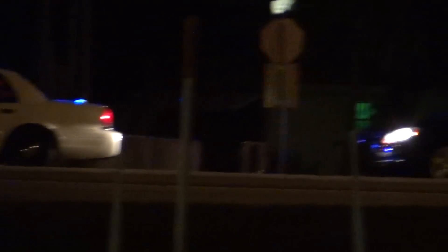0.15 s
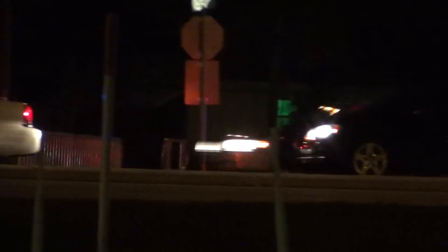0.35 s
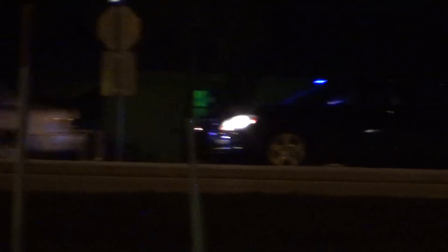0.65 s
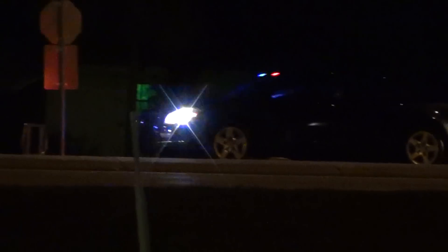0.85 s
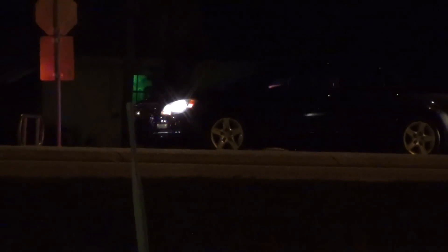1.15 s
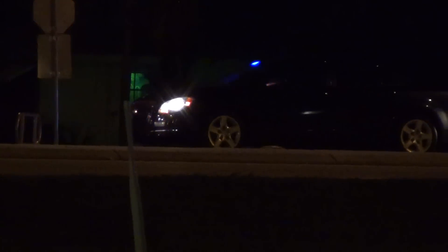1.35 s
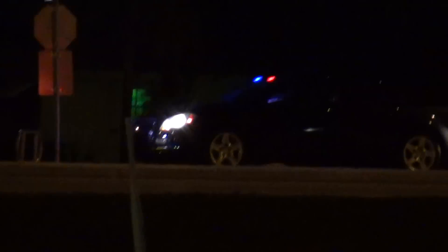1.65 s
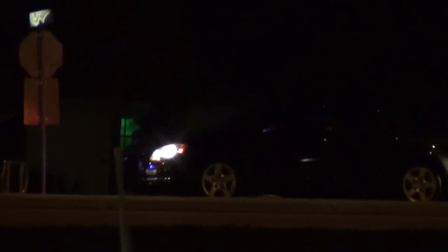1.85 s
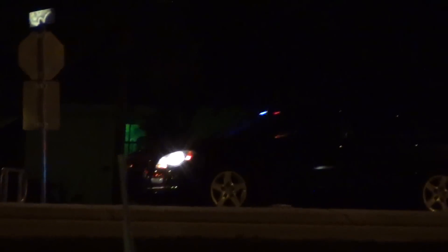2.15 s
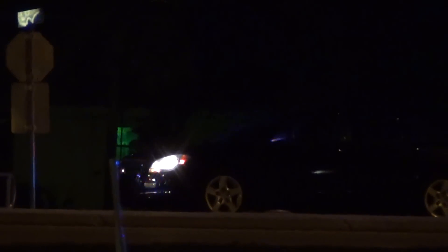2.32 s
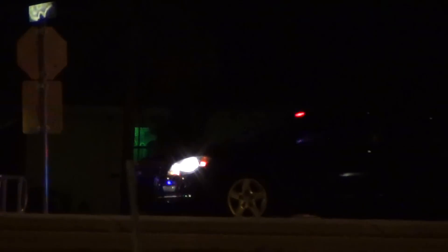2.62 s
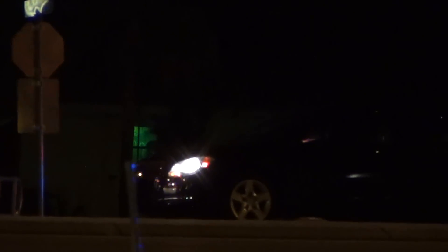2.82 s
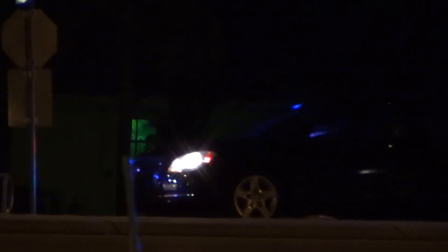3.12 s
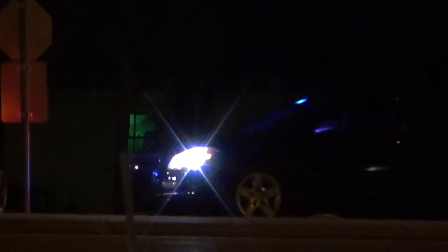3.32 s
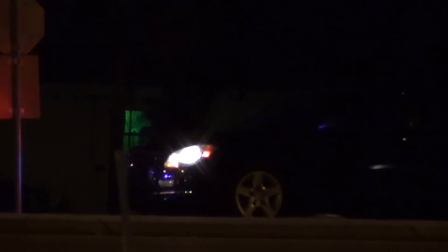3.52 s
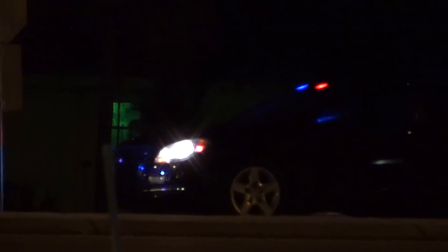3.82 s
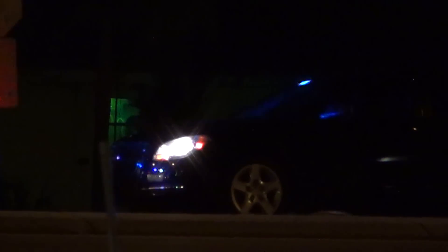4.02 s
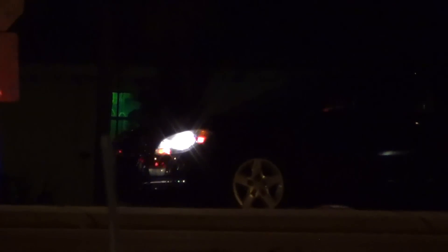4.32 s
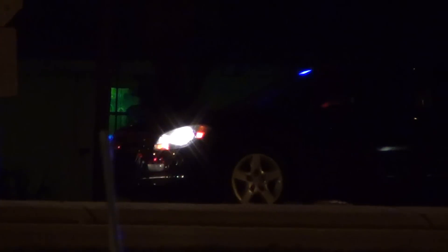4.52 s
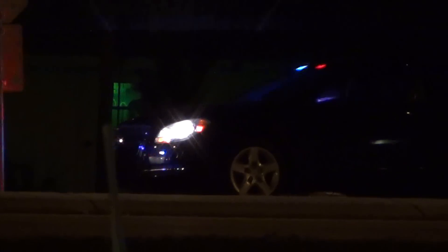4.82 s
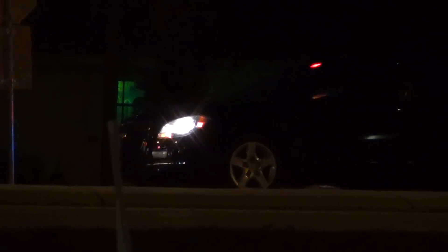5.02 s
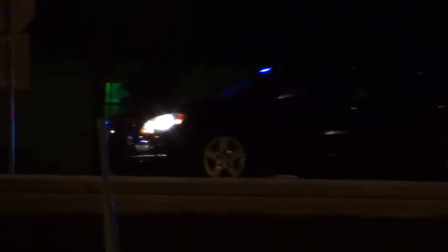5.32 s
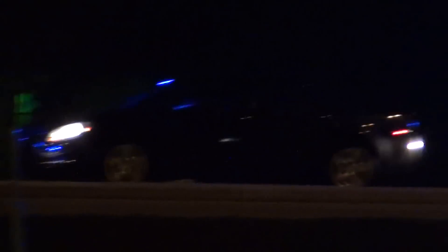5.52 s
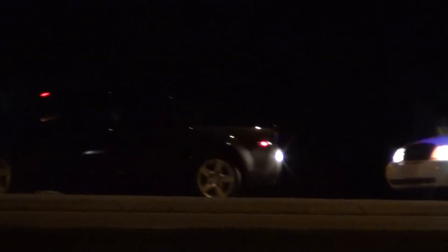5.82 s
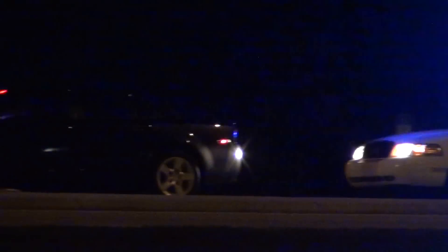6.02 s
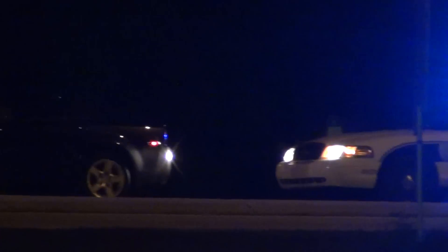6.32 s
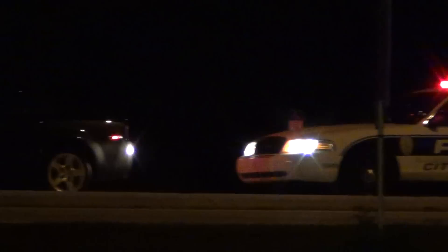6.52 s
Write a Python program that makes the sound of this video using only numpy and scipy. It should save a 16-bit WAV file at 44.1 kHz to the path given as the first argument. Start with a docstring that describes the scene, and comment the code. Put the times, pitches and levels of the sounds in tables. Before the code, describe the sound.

Blustery low wind rumble and rasping gusts cover a quiet idling engine and soft road noise from cars creeping past at night.

```python
"""Cars idle and creep along a road at night, heard from the verge in a steady breeze.
From the start eddies, kicks of dull noise, buffet the microphone; the hard ones add a rasp. Under them an
engine throbs (a sine), its top end ticks (gated noise) and its belt whines (narrow noise) in the traffic's
roar and hiss (wide noise). Dry pops, quick flips of pressure, soon join in. Then the road sound, except the
throb, begins to dip briefly now and then. Late on the breeze grows and two tiny clicks (short tones) sound."""
import sys
import numpy as np
from scipy import signal
from scipy.fft import rfft, irfft, next_fast_len
from scipy.io import wavfile
from scipy.ndimage import uniform_filter1d

SR = 44100
rng = np.random.default_rng(int(sys.argv[2]) if len(sys.argv) > 2 else 0)


def transcribe(signal):
    """Save signal, clipped to [-1, 1], as a 16-bit WAV file at the path in sys.argv[1]."""
    frames = np.atleast_2d(signal).T
    limited = np.clip(frames, -1, 1)
    pcm = np.round(limited * 32767).astype(np.int16)
    wavfile.write(sys.argv[1], SR, pcm)


N = 293706
TIME = np.arange(N) / SR  # seconds
FREQ = np.maximum(np.arange(N // 2 + 1) * SR / N, 1)  # Hz


def undb(db):
    """Turn decibels into a gain."""
    return 10 ** (np.asarray(db) / 20)


def unit(x):
    """Scale to an average (rms) level of 1."""
    return x / np.sqrt(np.mean(x ** 2))


def curve(points, at=TIME):
    """Join (seconds, dB) points with straight lines."""
    seconds, db = np.transpose(points)
    return np.interp(at, seconds, db)


def response(points):
    """Gain at every frequency, from (Hz, dB) points joined on a logarithmic pitch scale."""
    hz, db = np.transpose(points)
    return undb(np.interp(np.log(FREQ), np.log(hz), db))


def colour(x, gain):
    """Filter a sound by giving each frequency its own gain."""
    size = next_fast_len(N, real=True)
    bins_hz = np.arange(size // 2 + 1) * SR / size
    spectrum = rfft(x, size) * np.interp(bins_hz, FREQ, gain)
    return irfft(spectrum, size)[..., :N]


def walk(hz):
    """Smooth chance movement with spread 1, moving up to about hz times a second."""
    return unit(colour(rng.standard_normal(N), np.exp(-(FREQ / hz) ** 2)))


def bump(at, length):
    """A bell in time, length seconds wide at half its height."""
    bell = np.zeros(N)
    near = slice(*np.searchsorted(TIME, [at - 2 * length, at + 2 * length]))
    bell[near] = np.exp2(-(2 * (TIME[near] - at) / length) ** 2)
    return bell


def noise(gain):
    """Two unrelated noises (mid, side) of one colour."""
    return unit(colour(rng.standard_normal((2, N)), gain))


def stereo(pair, side):
    """Left and right are the mid plus and minus the side, whose strength depends on pitch."""
    return pair[0] + np.array([[1], [-1]]) * colour(pair[1], response(side))


# How strong the breeze is. Each row: time in seconds, level in dB against its usual strength.
BREEZE_STRENGTH = [(0, 0), (1, 1), (1.9, 0), (2.7, -0.5), (3.5, 0.5), (4.2, -0.5), (5.1, 2.5), (5.8, 4),
                   (6.66, 3)]


def breeze_db(at=TIME):
    """The slow rise and fall of the breeze, which also carries the scattered eddies."""
    return curve(BREEZE_STRENGTH, at)


# Eddies at set moments, most of them strong.
# Each row: middle in seconds, level in dB, length in seconds, edge against the body in dB before a trim.
SET_EDDIES = [(0.005, -26, 0.03, -5), (0.07, -25.5, 0.016, -13), (0.116, -24, 0.023, -5.5),
              (0.231, -25.5, 0.028, -16), (0.327, -22.5, 0.022, -11), (0.434, -19.5, 0.021, -18),
              (0.51, -20.5, 0.034, -15.5), (.581, -21.5, 0.016, -16), (0.677, -18.5, 0.019, -16),
              (0.73, -25.5, 0.048, -25), (0.896, -17.5, 0.0079, -35), (0.957, -21, 0.013, -12),
              (1.027, -22, 0.022, -16), (1.096, -22.5, 0.034, -24), (1.226, -23, 0.033, -13),
              (1.268, -19, 0.015, -13), (1.406, -24, 0.043, -9), (1.467, -20.5, 0.014, -17),
              (1.545, -21.5, 0.025, -9.5), (1.64, -23, 0.03, -10), (1.694, -23.5, 0.037, -10),
              (1.76, -21, 0.021, -10), (1.804, -23.5, 0.025, -28), (1.866, -22.5, 0.011, -7.5),
              (1.905, -20.5, 0.0097, -13), (1.945, -20, 0.012, -27), (2.008, -24, 0.042, -15),
              (2.077, -24.5, 0.028, -10), (2.13, -23, 0.02, -7), (2.184, -23.5, 0.017, -21),
              (2.294, -23, 0.014, -12), (2.333, -20, .019, -10), (2.356, -22.5, 0.02, -19),
              (2.463, -20, 0.02, -29), (2.545, -21.5, 0.017, -26), (2.585, -22.5, 0.025, -11),
              (2.621, -22, 0.028, -6), (2.728, -20.5, 0.017, -13), (2.81, -22, 0.021, -14),
              (2.868, -24.5, 0.031, -9), (2.898, -23, 0.039, -14), (2.977, -22, 0.014, -15),
              (3.02, -23, 0.018, -8), (3.159, -25.5, 0.02, -7), (3.23, -24.5, 0.026, -8),
              (3.315, -19, 0.012, -11), (3.359, -24, 0.022, -8), (3.382, -27, 0.013, -19),
              (3.527, -28.5, 0.022, -15), (3.613, -22, 0.032, -10), (3.693, -20.5, 0.0078, -11.5),
              (3.909, -21.5, 0.017, -18), (3.952, -23.5, 0.035, -11), (4.048, -20, 0.018, -12.5),
              (4.205, -25, 0.038, -15), (4.256, -23.5, 0.02, -15), (4.29, -24.5, 0.024, -10),
              (4.477, -21.5, 0.033, -10.5), (4.568, -21.5, 0.026, -21), (4.679, -22, 0.02, -6.5),
              (4.831, -22.5, 0.01, -25), (4.937, -21.5, 0.014, -10.5), (4.984, -28, 0.035, -22),
              (5.054, -22.5, 0.049, -18), (5.097, -25.5, .015, -8), (5.195, -24, 0.016, -12),
              (5.231, -21.5, 0.016, -20), (5.265, -23.5, 0.012, -15), (5.345, -25, 0.023, -11),
              (5.458, -26.5, 0.049, -15), (5.503, -20.5, 0.028, -15), (5.594, -19.5, 0.014, -16),
              (5.628, -21, 0.013, -17), (5.705, -21.5, 0.019, -22), (5.774, -20.5, 0.014, -7),
              (5.9, -20, 0.024, -13), (6.058, -20.5, 0.025, -11), (6.148, -22, 0.017, -26),
              (6.244, -22, 0.015, -9), (6.305, -21.5, 0.0062, -8), (6.495, -26.5, 0.058, -8.5),
              (6.626, -26.5, 0.021, -8)]


def eddies(count=140):
    """Scattered eddies drift past at a loose pace, follow the breeze and leave room for the set ones."""
    gap_s, jitter_s, room_s = 0.036, 0.008, 0.026
    shift, strength, stretch, hardness = rng.standard_normal((count, 4)).T
    at = np.arange(count) * gap_s + jitter_s * shift
    level_db = -26 + breeze_db(at) - 0.5 * strength
    length_s = 0.016 * np.exp(0.098 * stretch)
    edge_db = -14 + 1.0 * hardness
    scattered = np.transpose([at, level_db, length_s, edge_db])
    nearest_s = np.abs(at[:, None] - np.array(SET_EDDIES)[:, 0]).min(axis=1)
    return [*SET_EDDIES, *scattered[(nearest_s > room_s) & (at < TIME[-1])]]


def turbulence(spectrum, burst_db, burst_hz, even_s):
    """Pressure that comes in short kicks, with about the same power over the life of each eddy."""
    kicks = rng.standard_normal((2, N)) * undb(burst_db * walk(burst_hz))
    pressure = colour(kicks, response(spectrum))
    size = max(int(even_s * SR), 2)
    power = uniform_filter1d(uniform_filter1d(pressure[0] ** 2, size), size)
    # the small floor keeps near-silent moments from being blown up
    return pressure / np.sqrt(np.abs(power) + 0.014 * power.mean())


# How the deepest wind rumble rises and falls. Each row: time in seconds, change in dB.
DEEP_RUMBLE = [(0, -2), (1.2, -0.5), (2.2, 0.5), (3.0, -1.5), (3.7, 0.5), (4.3, -2), (4.8, -2.5),
               (5.4, -5.5), (6.1, 2), (6.66, 2.5)]


def sway_deep(thump, deep_hz=113):
    """Split off the rumble below deep_hz and let it rise and fall on its own."""
    deep = colour(thump, 1 / (1 + (FREQ / deep_hz) ** 6))
    return thump - deep + deep * undb(curve(DEEP_RUMBLE))


# Brief lulls of the breeze. Each row: middle in seconds, length in seconds.
BREEZE_LULLS = [(0.413, 0.013), (0.589, 0.012), (0.881, 0.017), (1.314, 0.054), (2.65, 0.051),
                (3.491, 0.039), (3.73, 0.017), (3.828, 0.037), (4.778, 0.028), (6.543, 0.035)]


def lulls(depth_db=-6):
    """Gain of the wind, which weakens for a moment in each lull."""
    return undb(depth_db * sum(bump(at, length) for at, length in BREEZE_LULLS))


# Tone of the dull wind thump. Each row: pitch in Hz, relative level in dB per Hz.
THUMP_TONE = [(8, -21), (20, -15), (35, -5.5), (60, -1), (110, 0.5), (200, -1.5), (250, -5), (330, -8),
              (450, -16), (700, -23.5), (1200, -56), (3000, -76), (12000, -100)]
# Tone of the rasping edge. Each row: pitch in Hz, relative level in dB per Hz.
RASP_TONE = [(150, -53), (300, 2), (460, 3.5), (700, -9.5), (1000, -11), (1600, -35.5), (3000, -61),
             (8000, -73), (16000, -85)]
# Stereo width of the wind. Each row: pitch in Hz, side against mid in dB.
WIND_WIDTH = [(25, -22), (60, -28), (125, -18), (250, -13.5), (500, -10.5), (2000, 0)]


def wind(body_floor_db=-32, edge_floor_db=-46, edge_trim_db=-1.55):
    """Each eddy is a dull thump over the light breeze; the hard ones add a rasping edge."""
    breeze = undb(breeze_db())
    # body and edge are powers, so that overlapping eddies add up
    body = (breeze * undb(body_floor_db)) ** 2
    edge = (breeze * undb(edge_floor_db)) ** 2
    for at, db, length, hard_db in eddies():
        eddy = bump(at, length)
        body += eddy * undb(db) ** 2
        edge += eddy * undb(db + hard_db + edge_trim_db) ** 2
    thump = np.sqrt(body) * turbulence(THUMP_TONE, burst_db=2.5, burst_hz=167, even_s=0.017)
    rasp = np.sqrt(edge) * turbulence(RASP_TONE, burst_db=4.5, burst_hz=226, even_s=0.019)
    mid, side = (sway_deep(thump) + rasp) * lulls()
    # hard eddies are small, so the two ports feel them differently; the soft breeze reaches both alike
    apart = unit(np.sqrt(edge) ** 0.34 * undb(3 * walk(45)))
    return stereo((mid, side * apart), WIND_WIDTH)


# How loud the road is. Each row: time in seconds, level in dB before each sound's own trim.
ROAD_LEVEL = [(0, -63), (0.25, -60), (.5, -61), (.85, -60.5), (1.2, -58.5), (1.5, -60), (1.9, -59.5),
              (2.35, -59), (2.55, -60.5), (3.1, -61), (3.6, -61.5), (4, -62), (4.35, -60.5), (4.7, -62),
              (5, -61), (5.5, -60.5), (5.85, -59.5), (6.25, -60), (6.66, -58)]


def road_db():
    """The slow swell of the road, shared by roar, hiss and belt whine."""
    return curve(ROAD_LEVEL)


# Tone of the engine's ticks. Each row: pitch in Hz, relative level in dB per Hz.
TICK_TONE = [(100, -33), (700, -17), (1400, 9.5), (2000, 3), (3000, -7.5), (6000, -17), (12000, -27),
             (18000, -55)]
# Bands of the belt drive whine. Each row: pitch in Hz, width in Hz, level in dB before sway and swell.
BELT_WHINE = [(728, 12, -59), (1308, 20, -58.5), (1409, 9, -62.5), (1885, 70, -60.5), (5035, 38, -83.5),
              (5880, 80, -77)]


def engine(firing_hz=33.9, throb_db=-36, tick_db=-55):
    """An idling engine: the exhaust throbs at the firing rate, the top end ticks, the belt whine sways."""
    firings = np.cumsum(firing_hz * (1 + 0.0036 * walk(2.0))) / SR
    throb = np.sqrt(2) * np.sin(2 * np.pi * firings) * undb(throb_db)

    # two ticks a firing, of unequal strength
    fade = np.exp(-(2 * firings % 1) / 0.29)
    gate = fade * (1 + 0.47 * np.cos(2 * np.pi * firings))
    ticks = unit(colour(gate * rng.standard_normal((2, N)), response(TICK_TONE)))

    whine = np.zeros((2, N))
    for hz, width, db in BELT_WHINE:
        band = noise(1 / (1 + (2 * (FREQ - hz) / width) ** 2))
        whine += band * undb(db + 3.2 * walk(3.2))
    whine *= undb(road_db() - road_db().mean())
    # the whine comes from straight ahead: mid only
    return throb, ticks * undb(tick_db) + whine * np.array([[1], [0]])


# Tone of the low roar. Each row: pitch in Hz, relative level in dB per Hz.
ROAR_TONE = [(40, 12), (200, 10.5), (500, 3), (750, 7), (930, 0.5), (1100, 3.5), (1240, 1.5), (1450, 1.5),
             (1680, -2.5), (1900, 0), (2280, -7), (2950, -6.5), (3200, -13.5), (5000, -44)]
# Tone of the hiss. Each row: pitch in Hz, relative level in dB per Hz.
HISS_TONE = [(2000, -25), (3300, 1.5), (4480, 2), (4620, -2.5), (5050, 0), (5900, -3), (6300, -6),
             (8600, -12.5), (10800, -11.5), (12500, -16), (14200, -19), (15000, -22), (18000, -33)]


def traffic(roar_db=21, hiss_db=1, flutter_db=0.9, air_hz=10500, air_swell=0.53):
    """Tyres and fans merge into a roar and hiss that swell and flutter in moving air; the top swells most."""
    level_db = road_db()
    roar = noise(response(ROAR_TONE)) * undb(roar_db)
    hiss = noise(response(HISS_TONE)) * undb(hiss_db)
    air = colour(hiss, 1 / (1 + (air_hz / FREQ) ** 8))
    hiss = hiss - air + air * undb(air_swell * (level_db - level_db.mean()))
    return (roar + hiss) * undb(level_db + flutter_db * walk(27))


# Sudden flips of pressure in the wind, each at its own moment.
# Each row: time in seconds, strength in dB before the trims, time setting of the swing in seconds.
PRESSURE_FLIPS = [(0.018, -13.5, 0.00046), (.071, -18, 0.0008), (.116, -15.5, 0.00066),
                  (0.269, -16, 0.00061), (0.4243, -20, 0.0006), (.3315, -13, 0.00059), (.478, -17, 0.00044),
                  (.834, -14.5, 0.00059), (1.017, -15.5, 0.00056), (1.228, -19, 0.00039),
                  (1.257, -15, 0.00059), (1.453, -13.5, 0.0006), (1.647, -15, .00036),
                  (1.688, -18, 0.00035), (1.745, -17.5, 0.00031), (1.861, -18.5, 0.00039),
                  (2.008, -15.5, 0.00025), (2.4649, -11.5, 0.00048), (2.5381, -14.5, 0.00043),
                  (2.804, -16.5, 0.0006), (2.863, -17.5, 0.00038), (2.9, -16.5, 0.00045),
                  (3.158, -17, 0.00032), (3.3882, -14.5, 0.00041), (3.4034, -11.5, 0.0004),
                  (3.954, -14.5, 0.00052), (4.473, -15, 0.0012), (4.529, -14.5, 0.00062),
                  (5.104, -19, 0.00026), (5.456, -18, 0.00058), (5.701, -17.5, 0.00072),
                  (5.85, -16, 0.00058), (5.896, -11, 0.00072), (5.901, -18.5, 0.0004),
                  (6.065, -11.5, 0.00062), (6.244, -16, 0.00061), (6.3083, -14.5, 0.0006)]


def pops(trim_db=-1, ports_db=2.5):
    """Pressure builds, flips and relaxes: a dry pop, brighter the quicker the swing, stronger at one port."""
    build_s, relax_s = 0.0018, 0.0008  # from half strength to the flip, and from the flip to half
    pressure = np.zeros((2, N))
    for at, db, swing_s in PRESSURE_FLIPS:
        sign, port = rng.choice([-1, 1], 2)
        life = np.where(TIME < at, bump(at, 2 * build_s), bump(at, 2 * relax_s))
        swing = sign * np.tanh(2 * (TIME - at) / swing_s) * life
        pressure += swing * undb(db + trim_db + ports_db * np.array([[port], [-port]]))
    return pressure


# Dips of the road sound at set moments. Each row: start of the hold in seconds, depth in dB.
SET_DIPS = [(0.342, -6), (0.444, -3), (0.503, -4.5), (0.705, -5), (0.898, -4), (1.402, -5), (1.649, -7.5),
            (1.912, -3), (2.133, -10), (2.468, -2.5), (2.726, -3), (3.066, -3), (3.264, -6), (3.412, -5),
            (3.625, -9), (4.265, -6), (4.496, -4), (4.584, -11), (4.718, -6.5), (5.268, -11), (5.358, -5),
            (5.519, -7), (6.316, -7.5)]


def dips(count=14, shallow_db=-3):
    """Gain of the road sound: it drops fast, holds and soon recovers, at set moments and by chance."""
    fall_s, hold_s, recover_s = 0.002, 0.0039, 0.014
    scattered = (np.arange(count) + rng.random(count)) / count * TIME[-1]
    gain_db = np.zeros(N)
    for at, db in [*SET_DIPS, *((at, shallow_db) for at in scattered)]:
        recovery = np.exp(-np.clip((TIME - at - hold_s) / recover_s, 0, 20))
        gain_db += db * np.where(TIME < at, bump(at, 2 * fall_s), recovery)
    return undb(gain_db)


# Tiny clicks. Each row: middle in seconds, pitch in Hz, length in seconds, peak in dB.
TINY_CLICKS = [(6.181, 12500, .0003, -47), (6.306, 2520, 0.002, -34.5)]


def clicks():
    """Tiny clicks close to the microphone: a few cycles of a tone under a bell."""
    total = np.zeros(N)
    for at, hz, length, db in TINY_CLICKS:
        total += undb(db) * bump(at, length) * np.sin(2 * np.pi * hz * (TIME - at))
    return total


# Stereo width of the road. Each row: pitch in Hz, side against mid in dB.
ROAD_WIDTH = [(100, -22), (600, -55), (1200, -12), (2500, -10), (5000, -8.5), (9000, -8.5), (11000, -17),
              (12500, -45)]
# Which way the road leans. Each row: pitch in Hz, left against right in dB.
ROAD_LEAN = [(300, 5.5), (700, 0), (1200, -1), (1900, -2.5), (3000, -3.5), (5000, -1.7), (8500, -0.5),
             (12000, .3)]


def scene(wind_left_db=0.4):
    """The road behind the wind; its low end leans to the left and most of its treble to the right."""
    gusts = (wind() + pops()) * undb(np.array([[wind_left_db], [-wind_left_db]]) / 2)
    throb, machinery = engine()
    road = stereo((traffic() + machinery) * dips(), ROAD_WIDTH)
    lean = np.sqrt(response(ROAD_LEAN))
    left, right = colour(road[0], lean), colour(road[1], 1 / lean)
    return gusts + throb + np.array([left, right]) + clicks()


def record(dry, top_hz=18150):
    """The sound eases in and out over 3 ms, and a steep filter cuts everything above top_hz."""
    ease = np.clip(np.minimum(TIME, TIME[-1] - TIME) / 0.003, 0, 1)
    top_cut = signal.ellip(10, 0.1, 80, top_hz, fs=SR, output="sos")
    return signal.sosfilt(top_cut, dry * ease)


dry = scene()
out = record(dry)
transcribe(out)
```